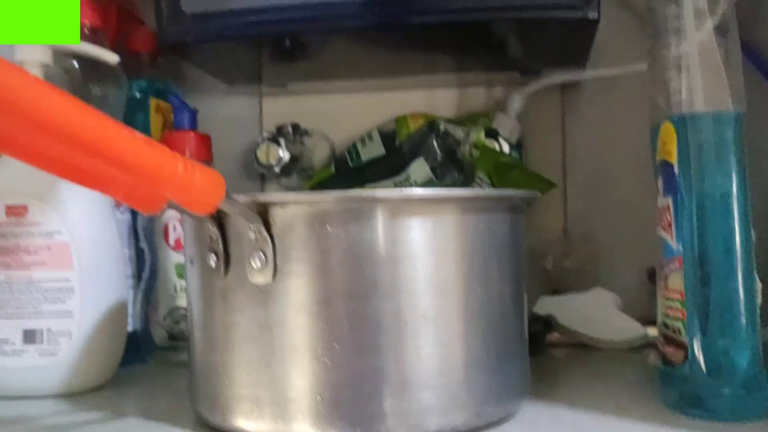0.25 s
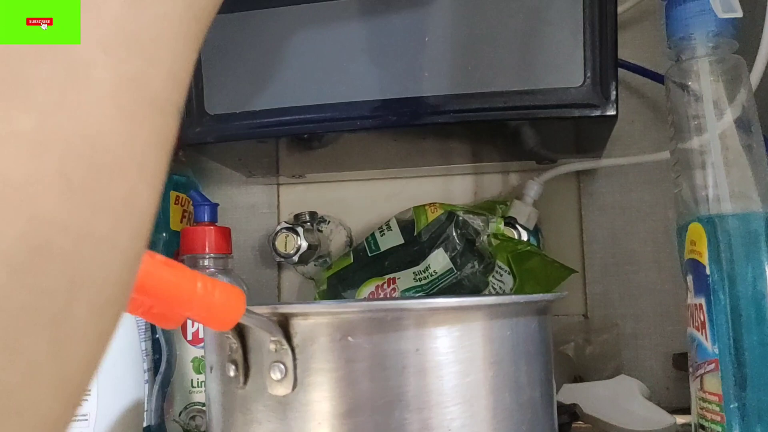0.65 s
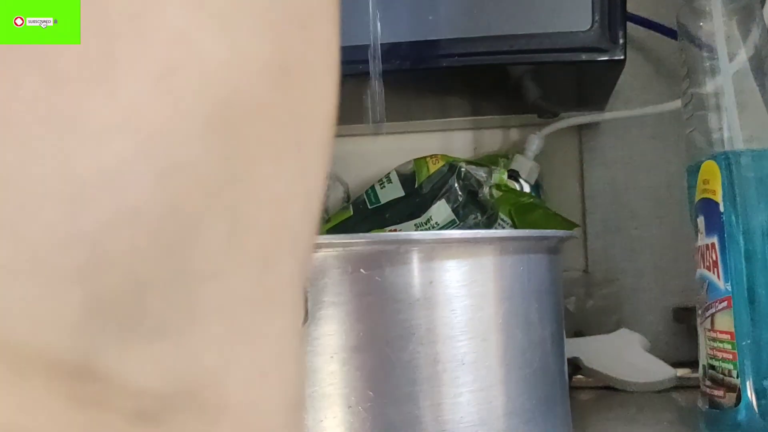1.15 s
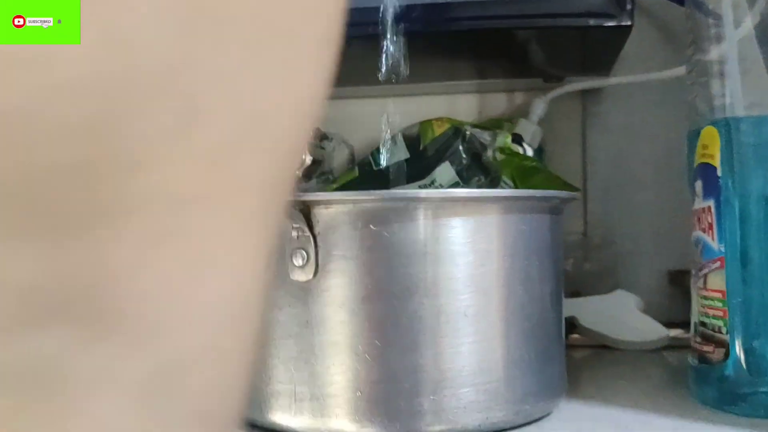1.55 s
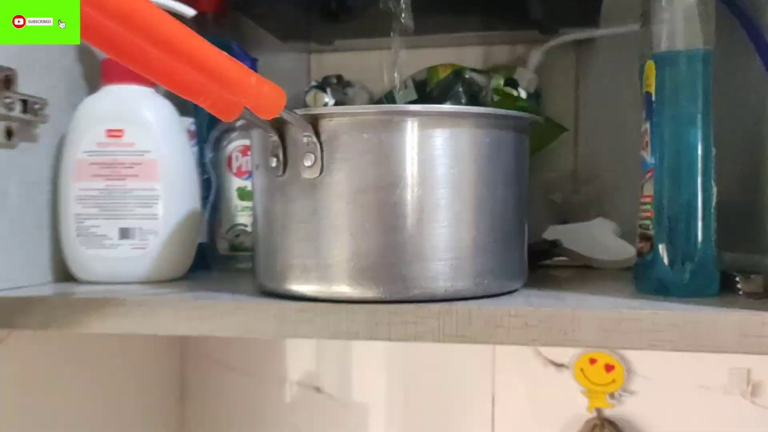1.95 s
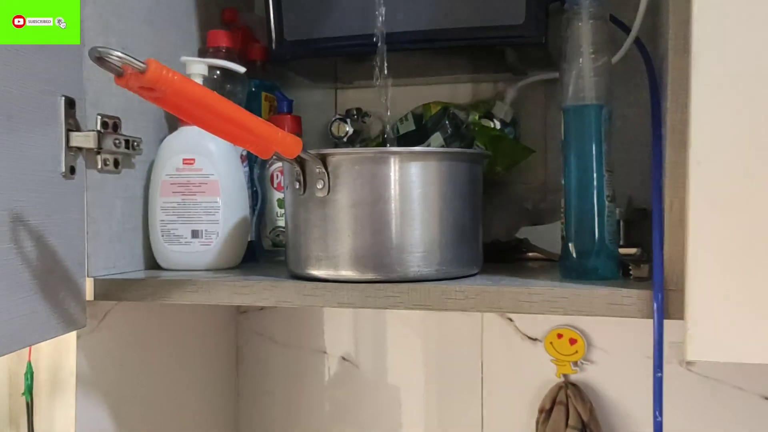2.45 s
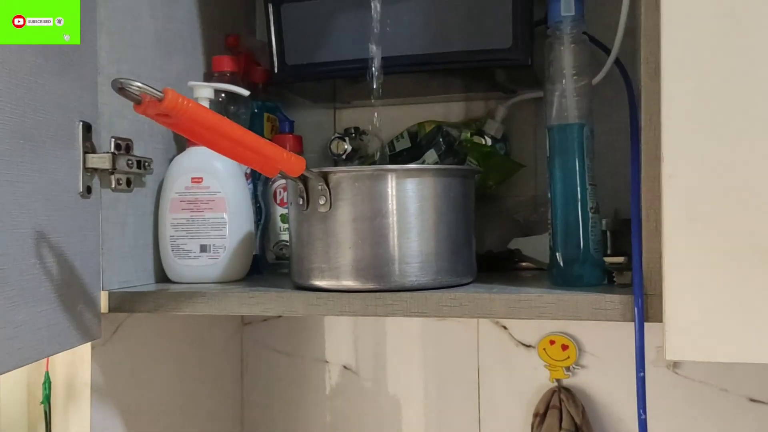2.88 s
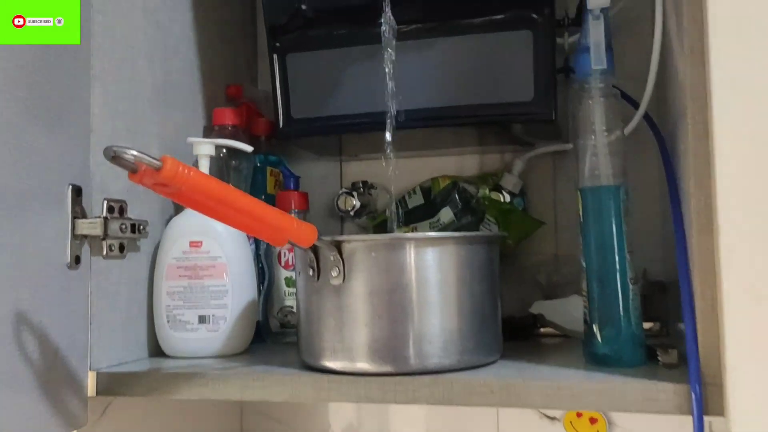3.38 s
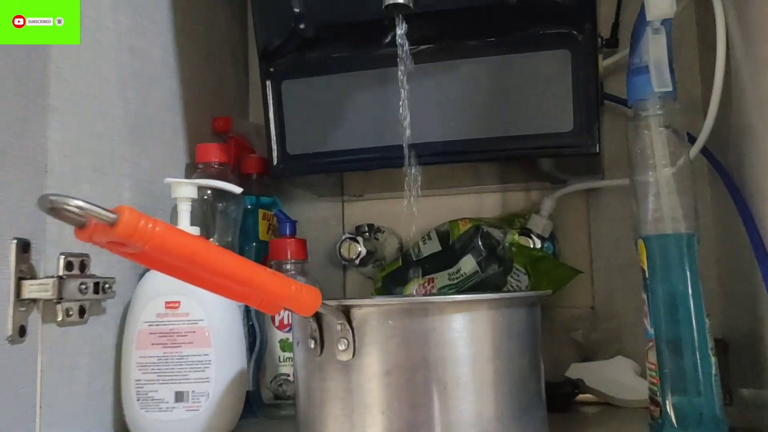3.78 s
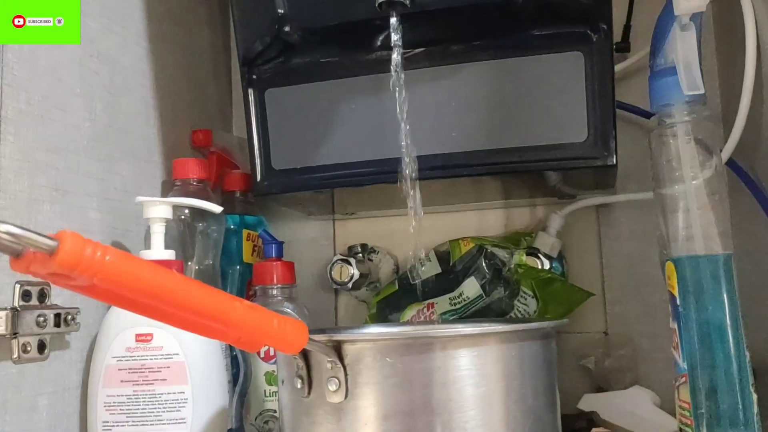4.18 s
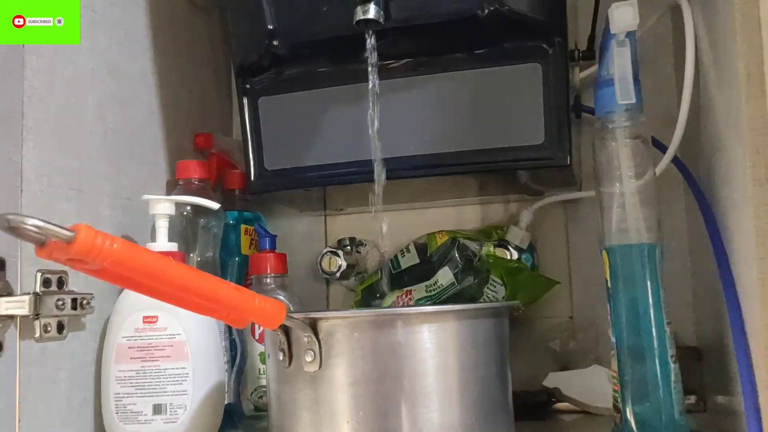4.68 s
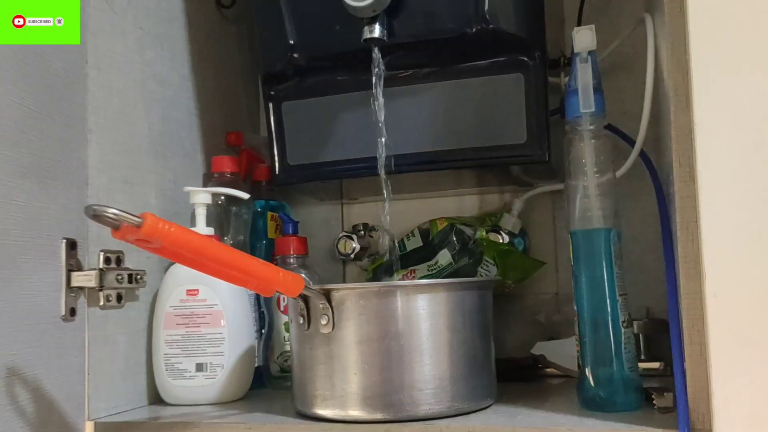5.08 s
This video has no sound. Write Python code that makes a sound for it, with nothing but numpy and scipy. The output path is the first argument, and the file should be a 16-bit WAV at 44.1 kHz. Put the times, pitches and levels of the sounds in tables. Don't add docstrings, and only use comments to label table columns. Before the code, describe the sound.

Dull knocks on a metal pot, then a thin stream splashes and fizzes into it, with sharp rhythmic hissing spurts close on the left.

```python
import sys
import numpy as np
from scipy import signal
from scipy.fft import rfft, irfft
from scipy.io import wavfile
from scipy.ndimage import uniform_filter1d

SR = 44100
rng = np.random.default_rng(int(sys.argv[2]) if len(sys.argv) > 2 else 0)


def volts_from_db(level):
    exponent = np.asarray(level, float) / 20
    return 10 ** exponent


def wav_out(sig):
    wavfile.write(sys.argv[1], SR, np.round(np.clip(np.atleast_2d(sig).T, -1, 1) * 32767).astype(np.int16))


N = 235185


def rms_one(x):
    return x / np.sqrt(np.mean(x ** 2) + 1e-20)


def in_time(rows, outside=None):
    s, *columns = np.transpose(rows)
    return [np.interp(np.arange(N) / SR, s, column, outside, outside) for column in columns]


def at_hz(points, hz):
    table_hz, values = np.transpose(points)
    return np.interp(np.log(hz), np.log(table_hz), values)


def coloured(x, spectrum):
    hz = np.maximum(np.fft.rfftfreq(x.shape[-1], 1 / SR), 1)
    return irfft(rfft(x) * volts_from_db(at_hz(spectrum, hz)), x.shape[-1])


def panned(x, pan_db):
    right = volts_from_db(-np.asarray(pan_db))
    return np.array([2 * x / (1 + right), 2 * x * right / (1 + right)])


def drift(rate):
    hop = 40
    r = np.exp(-2 * np.pi * rate * hop / SR)
    settle = 2000
    noise = rng.standard_normal(N // hop + settle + 2)
    slow = signal.lfilter([1], [1, -2 * r, r * r], noise)[settle:]
    return np.interp(np.arange(N) / hop, np.arange(len(slow)), rms_one(slow))


def resonate(x, hz, width_hz):
    r = np.exp(-np.pi * width_hz / SR)
    zeros = [(1 - r * r) / 2, 0, (r * r - 1) / 2]
    poles = [1, -2 * r * np.cos(2 * np.pi * hz / SR), r * r]
    return signal.lfilter(zeros, poles, x)


def cavity(x, peaks):
    modes = 0
    for k, (hz, width_hz, db) in enumerate(peaks):
        modes = modes + (-1) ** k * volts_from_db(db) * resonate(x, hz, width_hz)
    return rms_one(modes)


def grains(per_s, spread_db, count=N):
    sizes = volts_from_db(spread_db * np.minimum(rng.exponential(1, count), 4)) * rng.standard_normal(count)
    return rms_one(sizes * (rng.random(count) < per_s / SR) + 1e-9)


# f/Hz, likeness [1 = alike, 0 = unrelated]
LIKENESS = [(60, 1), (150, 1), (380, 0.94), (950, 0.076), (2380, -1.65), (5980, 0.92), (15000, -0.02)]


def banded(sources, spectrum, low_hz, top_hz, patchy_db, flicker_per_s):
    out, together = 0, drift(12.0)
    edges = low_hz * 2 ** np.arange(0, np.log2(top_hz / low_hz), 1 / 3)
    for k, (low, high) in enumerate(zip(edges, edges[1:])):
        band = signal.butter(2, [low, high], "band", fs=SR, output="sos")
        mid, side = signal.sosfilt(band, sources[k % 2])
        hz = np.sqrt(low * high)
        alike = np.clip(at_hz(LIKENESS, hz), 0, 1)
        flicker_db = patchy_db * (0.2 * together + drift(flicker_per_s))
        stereo = np.sqrt(1 + alike) * mid + np.sqrt(1 - alike) * side * [[1], [-1]]
        out = out + volts_from_db(at_hz(spectrum, hz) + flicker_db) * stereo
    return out / np.sqrt(np.mean(out.mean(axis=0) ** 2))


def place(hits):
    out = np.zeros((2, N + SR))
    for s, sound, pan_db in hits:
        start = round(s * SR)
        out[:, start:start + len(sound)] += panned(sound, pan_db)
    return out[:, :N]


# t/s, level/dB, 1-2.5 kHz part re level/dB, left-right/dB
STREAM = [(0.0, -56.5, -15, 6), (0.27, -71.5, -9, 3), (1.42, -65, -35, 3.5), (1.48, -49.5, 13, 2.5),
          (1.65, -49, 2, 4), (1.82, -47, 5.5, 4), (2.43, -47, 4.5, 5.5), (2.63, -51, 0, 6),
          (2.78, -50, 6.5, 5), (3.09, -47.5, 0, 6.5), (3.31, -48, 10, 4.5), (3.53, -54, 1, 3.5),
          (3.75, -47, -3, 3.5), (4.23, -49.5, 7, 5.5), (4.36, -47, 2.5, 5), (5.33, -44.5, -8, 4.5)]
# f/Hz, density/dB per Hz
FIZZ = [(530, -36), (900, -5), (1750, 3), (1950, 4.5), (2140, 3), (2470, 0.5), (4980, 2.5), (6890, 4.5),
        (11100, 5), (14700, -6), (16000, -16)]


def stream():
    level_db, low_db, pan_db = in_time(STREAM)
    bursts = [[grains(7000, 3.0), grains(7000, 3.0)] for _ in range(2)]
    fizz = banded(bursts, FIZZ, 900, 18000, patchy_db=2, flicker_per_s=20)
    low = signal.sosfilt(signal.butter(2, 2500, fs=SR, output="sos"), fizz)
    fizz = fizz + (volts_from_db(low_db) - 1) * low
    return volts_from_db(level_db) * fizz * panned(np.ones(N), pan_db)


# t/s, peak level/dB, ping f/Hz, spray re peak/dB, decay t60/s, left-
# right/dB
SPLASHES = [(0.1136, -42, 3850, -29, 0.028, 18), (0.171, -45, 5460, -11, 0.024, 11.5),
            (0.5766, -32.5, 6000, 33, 0.04, 5), (0.7146, -42, 4710, -15, 0.02, 14),
            (0.833, -38, 2450, -40, 0.02, 21), (1.1349, -31, 2550, 20, 0.034, 6.5),
            (1.4759, -18.5, 8620, -1, 0.039, 3.5), (1.5806, -35, 8650, -10, 0.089, 1.5),
            (1.5936, -27, 7500, 2, 0.033, -2), (1.6523, -18, 9630, -11, 0.04, 2.5),
            (1.7494, -33, 7600, -7, 0.073, 3.5), (1.7969, -29.5, 5170, 11, 0.079, 3.0),
            (1.88, -30.5, 7600, 9, 0.17, 5.0), (1.915, -24, 4330, 17, 0.044, 6),
            (1.9905, -23, 11600, -3, 0.04, 3.5), (2.06, -21.5, 6700, -1, 0.046, 8.5),
            (2.1525, -19, 10800, 5, 0.036, 9), (2.204, -26, 11000, -23, 0.045, 12),
            (2.3002, -35, 6980, 9, 0.077, 5.5), (2.3872, -19.5, 8840, -16, 0.044, 12),
            (2.451, -23, 3920, -3, 0.043, 6), (2.5011, -25.5, 5670, -3, 0.14, 10),
            (2.5534, -22, 10500, 1, 0.039, 6.5), (2.6038, -34, 8450, -5, 0.06, 8),
            (2.7337, -33, 8100, -3, 0.06, 11), (2.797, -31.5, 8040, -28, 0.06, 12),
            (2.837, -34, 4150, -12, 0.054, 9.5), (3.046, -35.5, 5000, -9, 0.06, -2),
            (3.099, -34.5, 7140, -24, 0.045, 5.5), (3.2016, -24.5, 4230, -15, 0.023, 12),
            (3.463, -37, 6960, 7, 0.06, 12), (3.5, -27.5, 2400, 31, 0.069, 8),
            (3.5456, -29, 3970, 8, 0.065, 8), (3.6501, -18, 8900, 1, 0.04, 5.5),
            (3.7684, -32, 2900, 11, 0.06, 6), (3.7978, -29, 9500, 4, 0.038, 3.0),
            (3.8204, -32, 11200, -13, 0.06, 3.5), (3.8642, -26.5, 6160, -14, 0.078, 0),
            (3.8837, -28.5, 6440, -6, 0.067, 19), (3.9063, -28, 3870, 2, 0.05, -1),
            (4.1235, -29.5, 7200, 8, 0.18, 0), (4.2363, -23.5, 4530, 4, 0.031, 8.5),
            (4.4079, -28.5, 8500, -18, 0.18, 5), (4.4695, -27, 5600, -36, 0.024, 2),
            (4.7656, -18, 5400, -1, 0.029, 7), (4.8474, -41, 7890, 10, 0.041, 15),
            (5.0254, -27.5, 9140, -19, 0.12, 7), (5.1267, -34, 2210, 4, 0.088, 3),
            (5.1642, -21, 4350, -9, 0.027, 12), (5.2685, -30, 7850, -11, 0.069, 6.5),
            (5.2794, -31.5, 5150, -10, 0.051, 2),
            (.232, -48.5, 3000, 13, 0.017, -2),
    (.436, -46, 8208, -21, 0.054, 10),
    (.75, -54, 7500, -2, .04, 6),
    (0.8317, -38, 3100, -28, 0.0076, 13),
    (.845, -45, 4260, -9, 0.34, 9),
    (1.652, -17, 4980, 2, 0.04, 2),
    (1.693, -33, 5616, -6, .06, 3),
    (4.243, -28, 4360, -6, .015, 6),
            (0.4344, -46.5, 2020, -23, 0.033, 4.0),
    (1.9917, -29, 1890, -5, 0.044, 7.5),
    (3.1366, -41, 2440, -13, 0.05, 5.0),
    (3.4378, -44, 2510, -15, 0.062, 5.0),
            (4.6114, -26, 5700, 3, 0.06, 4.5),
    (4.7495, -24, 5500, -2, 0.046, 4.5),
    (4.9567, -27, 6800, 0, 0.072, 6.7),
    (5.0174, -26, 9400, 0, 0.068, 5.0),
]


def splashes():
    t, hits, feed = np.arange(SR // 4) / SR, [], []
    spray_band = signal.butter(2, [2500, 14000], "band", fs=SR, output="sos")
    for s, peak_db, hz, spray_db, t60, pan_db in SPLASHES:
        burst = grains(12000, spread_db=2, count=len(t))
        burst = burst * volts_from_db(-60 * t / max(t60, 0.008)) * np.minimum(t / 0.00079, 1)
        spray = rms_one(resonate(burst, hz, 0.7 * hz)) + 0.4 * rms_one(signal.sosfilt(spray_band, burst))
        sound = rms_one(resonate(burst, hz, 0.081 * hz)) + volts_from_db(spray_db) * spray
        sound = volts_from_db(peak_db + 1.0) * sound / np.abs(sound).max()
        hits.append((s, sound, pan_db))
        feed.append((s, sound * volts_from_db(-2.5 * max(pan_db - 9.5, 0)), 0))
    return place(hits), place(feed)


def droplets():
    drops_per_s, strays_db, ring_cycles, voices = 500, -9, 48, 22
    level_db, _, pan_db = in_time(STREAM)
    clicks = grains(drops_per_s * volts_from_db(4 * drift(7.2)), spread_db=2)
    pitches, sides_db = np.geomspace(2600, 14000, voices), rng.normal(0, 3, voices)
    dealt = rng.integers(0, voices, N)
    pings = 0
    for k, (hz, side_db) in enumerate(zip(pitches, sides_db)):
        ping = resonate(clicks * (dealt == k) + 1e-18, hz, 1.5 * hz / ring_cycles)
        pings = pings + panned(ping, side_db)
    return volts_from_db(level_db + strays_db) * rms_one(pings) * panned(np.ones(N), pan_db)


# f/Hz, width/Hz, level/dB
POT_AIR = [(588, 38, -65.5), (795.4, 28, -66), (1388, 30, -64.5), (1878, 37, -78)]


def pot_air():
    level_db = in_time(STREAM)[0]
    modes = 0
    for hz, width_hz, db in POT_AIR:
        once = resonate(rng.standard_normal((2, N)), hz, width_hz)
        modes = modes + volts_from_db(db) * rms_one(resonate(once, hz, width_hz))
    return modes * volts_from_db(0.8 * (level_db + 47))


# t/s, level/dB, deep cavity re level/dB, sizzle re level/dB
SPURTS = [
    [(2.846, -50, -17, 9), (2.864, -33.5, -9, -0.5), (2.886, -33, 7.5, 4), (2.908, -48, -8, 7)],
    [(3.218, -47, -8, -2), (3.238, -31, -6, 1.5), (3.258, -25, 1.5, -3), (3.28, -52, -1, -3)],
    [(3.562, -48.5, -21, 1), (3.602, -24.5, 0, 1), (3.624, -41, 4.5, -1), (3.632, -45, -8, 3)],
    [(3.912, -50, -5, 21), (3.92, -43.5, -21, 7.5), (3.952, -26.5, -4.5, 2), (3.97, -26.5, 3, 2.5),
     (3.992, -48, -5, -15)],
    [(4.248, -54, -2, -2), (4.266, -31.5, -8, 7.5), (4.288, -23.5, 0, 2), (4.315, -49.5, 9, 9)],
    [(4.552, -49, -4, -10), (4.582, -29.5, -7, 1), (4.594, -29, 3.5, 3), (4.608, -54, 7, -2)],
    [(4.86, -47, -7, 4.5), (4.88, -29.5, 2.5, 7.5), (4.902, -27.5, 2.5, 5), (4.92, -43, -4, -7)],
    [(5.172, -50, -11, 3), (5.198, -24, -9, 1), (5.226, -31, 7.5, 9), (5.243, -63, -16, -11)],
]
# f/Hz, width/Hz, level/dB
DEEPEST_CAVITY = [(2005, 73, -10.5), (2400, 217, 10.5)]
DEEP_CAVITY = [(2470, 230, -13), (2827, 270, 16)]
MAIN_CAVITY = [(3880, 310, 0.25), (4040, 103, -3.3), (4020, 360, -0.65), (4510, 240, 0.37)]
SIZZLE_PEAKS = [(5680, 1100, -3.5), (6760, 460, -1), (7920, 420, 0.5), (9000, 650, -1), (10800, 3400, -5.5),
                (14600, 1900, -18.5)]


def spurts():
    deepest_lag_s, trim_db, left_db = 0.0037, -5.5, 12.5
    spit, other = grains(12000, spread_db=1.5), grains(12000, spread_db=1.5)
    deepest, deep = cavity(spit, DEEPEST_CAVITY), cavity(spit, DEEP_CAVITY)
    main, sizzle = cavity(spit, MAIN_CAVITY), cavity(spit, SIZZLE_PEAKS)
    far_sizzle = 0.6 * sizzle + 0.8 * cavity(other, SIZZLE_PEAKS)
    out, glide = np.zeros((2, N)), gliding_whistle()
    for rows in SPURTS:
        s, level_db, deep_db, sizzle_db = np.transpose(rows)
        parts = ((0, 0, main + glide),
                 (0, deep_db + trim_db, deep),
                 (deepest_lag_s, deep_db + trim_db, deepest),
                 (0, sizzle_db, np.array([sizzle, far_sizzle])))
        for lag, part_db, sound in parts:
            root_gain = volts_from_db((level_db + part_db - 1.0) / 2)
            swell = np.interp(np.arange(N) / SR - lag, s, root_gain, 0, 0) ** 2
            out += uniform_filter1d(swell, size=300) * sound
    steep = signal.butter(5, 1900, "high", fs=SR, output="sos")
    return signal.sosfilt(steep, out) * panned(np.ones(N), left_db)


# start f/Hz, end f/Hz, width/Hz, level re spurt/dB
GLIDE = (4599, 2350, 274, -10)


def gliding_whistle():
    start_hz, end_hz, width_hz, db = GLIDE
    times = np.ravel([(rows[0][0] + 0.011, rows[-1][0] - 0.006) for rows in SPURTS])
    hz = np.interp(np.arange(N) / SR, times, np.tile([start_hz, end_hz], len(SPURTS)))
    lowpass = signal.butter(2, width_hz, fs=SR, output="sos")
    real, imaginary = signal.sosfilt(lowpass, rng.standard_normal((2, N)))
    carrier = np.exp(2j * np.pi * np.cumsum(hz) / SR)
    return volts_from_db(db) * rms_one(np.real((real + 1j * imaginary) * carrier))


# t/s, peak level/dB, bright crack re peak/dB, left-right/dB, strongest body mode f/Hz
KNOCKS = [
    (0.051, -26, -42, 8, 404),
    (0.392, -52, -5, 7, 1040),
    (0.435, -37.5, -34, 6, 199),
    (0.831, -45, 9, 7, 230),
    (0.988, -30, -8, 8, 215),
    (1.132, -40, 1, -1, 242),
    (1.348, -48.5, 2, 9, 150),
]
# f/Hz, level/dB, decay t60/s
KNOCK_MODES = [(154.5, 3, 0.12), (196, 3.5, 0.081), (282, 3.5, 0.064), (420.6, -2, 0.054),
               (497, -3.5, 0.048), (646, -10.5, 0.15), (800, -14, 0.15), (960, -24, 0.12)]
# f/Hz, density/dB per Hz
CRACK = [(350, -35), (600, -29), (1100, -1.5), (1540, -4.5), (2540, 3), (2820, -7), (4400, -10),
         (5040, -14.5), (15000, -25)]


def knocks():
    t, hits = np.arange(SR // 3) / SR, []
    for s, peak_db, crack_db, pan_db, centre_hz in KNOCKS:
        contact = rng.standard_normal(len(t)) * volts_from_db(-60 * t / 0.034) * np.minimum(t / 0.0012, 1)
        body = 0
        for hz, db, t60 in KNOCK_MODES:
            octaves_away = abs(np.log2(hz / centre_hz))
            mode = rms_one(resonate(contact, hz, 2.6 / min(t60, 0.15)))
            body = body + volts_from_db(db - 14 * octaves_away) * mode
        thump = np.sin(2 * np.pi * centre_hz * t) * volts_from_db(-60 * t / 0.075) * np.minimum(t / 0.0024, 1)
        body = body / np.abs(body).max() + 1.04 * thump
        crack = rms_one(coloured(rng.standard_normal(len(t)), CRACK))
        crack = crack * volts_from_db(-60 * t / 0.18) * np.minimum(t / 0.0013, 1)
        knock = body / np.abs(body).max() + volts_from_db(crack_db - 8.5) * crack
        hits.append((s, volts_from_db(peak_db) * knock, pan_db))
    return place(hits)


# t/s, level/dB
HANDLING = [(0.0, -19.5), (0.028, -56), (0.062, -27), (0.09, -38), (0.35, -69), (0.408, -90), (0.43, -41.5),
            (0.446, -35), (0.618, -64), (0.626, -68), (0.68, -50.5), (0.776, -76), (0.848, -48),
            (0.888, -41.5), (0.96, -65), (0.986, -35), (1.128, -60), (1.148, -44.5), (1.236, -56),
            (1.286, -73), (1.408, -53), (1.5, -54.5)]


def handling():
    rub = grains(3000, spread_db=0.5)
    body = cavity(rub, [(hz, 45.0, db) for hz, db, t60 in KNOCK_MODES])
    level_db = in_time(HANDLING, outside=-200)[0]
    return panned(volts_from_db(level_db - 3.5) * body, 0.3)


# t/s, level/dB, left-right/dB
PUFFS = [(0.0, -54, -1), (0.06, -44, -3), (0.31, -59, 6), (0.36, -49.5, -5), (0.79, -44, 0),
         (1.19, -46, -3), (1.27, -63, 8), (1.35, -46.5, 4.5), (1.48, -53, 9), (1.54, -57, 5),
         (1.65, -52, -0.5), (1.82, -44, 32), (1.91, -39, 15), (1.97, -29, 7), (2.02, -26, -26),
         (2.12, -49, -6.0), (2.32, -49, 1), (2.4, -42, 2.0), (2.48, -55, 2), (2.55, -48, 1),
         (3.28, -51.5, 0), (3.56, -46, -5), (3.64, -48, 4), (4.56, -49, 4), (4.65, -42, 1),
         (4.91, -59, 2.0), (5.09, -49, 8.5), (5.18, -55, 1.5), (5.27, -46, 3.0), (5.33, -58, 3.0)]
# t/s of the flip, suction/s, push/s, peak level/dB, left-right/dB
SHOVE = (1.988, .05, .019, -19, -9)


def port_air():
    level_db, pan_db = in_time(PUFFS)
    shared, own = rng.standard_normal(N), rng.standard_normal((2, N))
    sub_bass = signal.butter(3, [11, 28], "band", fs=SR, output="sos")
    lumps = rms_one(signal.sosfilt(sub_bass, 0.8 * shared + own))
    lumps = volts_from_db(np.minimum(level_db, -42)) * lumps * panned(np.ones(N), pan_db)
    s, suck, push, peak_db, shove_pan_db = SHOVE
    t = np.arange(N) / SR - s
    jolt = np.interp(t, [-suck, -0.003, 0.005, push, push + 0.014], [0, -0.55, 0.65, 1, -0.1], 0, 0)
    jolt = uniform_filter1d(jolt, size=90)
    return lumps + volts_from_db(peak_db) * panned(jolt, shove_pan_db)


# t/s, level/dB, left-right/dB
FLUTTER = [
    (1.76, -51, -1.0),
    (1.846, -48, -5),
    (1.916, -49, -3.0),
    (1.95, -47, 4.0),
    (1.97, -50, -6.5),
    (1.99, -45, -11),
    (2.01, -33, -14.0),
    (2.032, -49, 0),
    (2.12, -50, 3),
]


def flutter():
    level_db, pan_db = in_time(FLUTTER, outside=-200)
    lumps = np.array([grains(120, spread_db=9.0), grains(120, spread_db=3.5)])
    low_band = signal.butter(2, [40, 170], "band", fs=SR, output="sos")
    lumps = rms_one(signal.sosfilt(low_band, lumps))
    return volts_from_db(level_db - 2.0) * lumps * panned(np.ones(N), pan_db)


# t/s, level/dB
RUMBLE_LEVEL = [(0.0, -39), (0.21, -62.5), (0.65, -62), (1.33, -61), (1.6, -47), (1.81, -51.5), (1.94, -50),
                (2.64, -54.5), (2.85, -55), (3.01, -54.5), (4.24, -52), (4.48, -53), (4.88, -51.5),
                (5.33, -53.5)]
# f/Hz, density/dB per Hz
RUMBLE = [(12, -29), (20, -4.5), (70, -9), (139, -4.5), (294, -17.5), (338, -12.5), (431, -21.5),
          (584, -18), (672, -15.5), (823, -17), (1210, -28), (1360, -28), (1700, -27.5), (2500, -26.5),
          (3250, -51), (5500, -120)]
# f/Hz, width/Hz, level/dB
HUMS = [(72, 23, -54.5), (120.3, 8.8, -58.5), (192.7, 22, -63.5), (251, 11.5, -64)]
# f/Hz, density/dB per Hz
HISS = [(530, -52), (900, 10), (1200, -7), (1370, -18), (2020, 9), (4200, -21), (14700, -41.5), (16000, -9)]


def rumble():
    noise = rng.standard_normal((2, 2, N))
    broad = banded(noise, RUMBLE, 36.04, 3000, patchy_db=2.6, flicker_per_s=3.9)
    drones = 0
    for hz, width_hz, db in HUMS:
        once = resonate(rng.standard_normal((2, N)), hz, width_hz)
        mid, side = resonate(once, hz, width_hz)
        drones = drones + volts_from_db(db) * (mid + 0.45 * side * [[1], [-1]]) / np.std(mid)
    hiss = volts_from_db(-69.5) * rms_one(coloured(rng.standard_normal((2, N)), HISS))
    return volts_from_db(in_time(RUMBLE_LEVEL)[0] + 1.0) * broad + drones + hiss


# f/Hz, decay t60/s
KITCHEN = [(200, 0.15), (1000, 0.68), (4000, 0.25), (12000, 0.26)]


def kitchen(x, wet_db, dark_pan_db=0.0):
    t, tail = np.arange(SR // 2) / SR, 0
    for hz in 125 * 2.0 ** np.arange(8):
        edges = [hz / 2 ** 0.5, min(hz * 2 ** 0.5, 0.45 * SR)]
        octave = signal.butter(2, edges, "band", fs=SR, output="sos")
        noise = signal.sosfilt(octave, rng.standard_normal((2, len(t))))
        tail = tail + noise * volts_from_db(-60 * t / at_hz(KITCHEN, hz))
    tail = tail * (1 - np.exp(-t / 0.0013)) * volts_from_db([[dark_pan_db / 2], [-dark_pan_db / 2]])
    tail = tail / np.sqrt(np.sum(tail ** 2) / 2)
    return volts_from_db(wet_db) * signal.fftconvolve(x.mean(axis=0)[None], tail, axes=1)[:, :N]


def scene():
    blows = knocks() + handling()
    drops, drop_feed = splashes()
    jets, strays = spurts(), droplets()
    room = kitchen(blows, -10.0) + kitchen(drop_feed + strays, -0.02, 5.3) + kitchen(jets, -15.0, 5.2)
    water = drops + jets + strays + stream() + pot_air()
    return blows + water + room + rumble() + port_air() + flutter()


def roll_off(x):
    return signal.sosfilt(signal.butter(12, 16500, fs=SR, output="sos"), x)


def record(dry):
    ports = np.array([np.roll(dry[0], 1), dry[1]])
    lowpass = signal.cheby2(12, 60, 16600, fs=SR, output="sos")
    mix = signal.sosfilt(lowpass, ports)
    return roll_off(mix)


dry = scene()
out = record(dry)
wav_out(out)
```